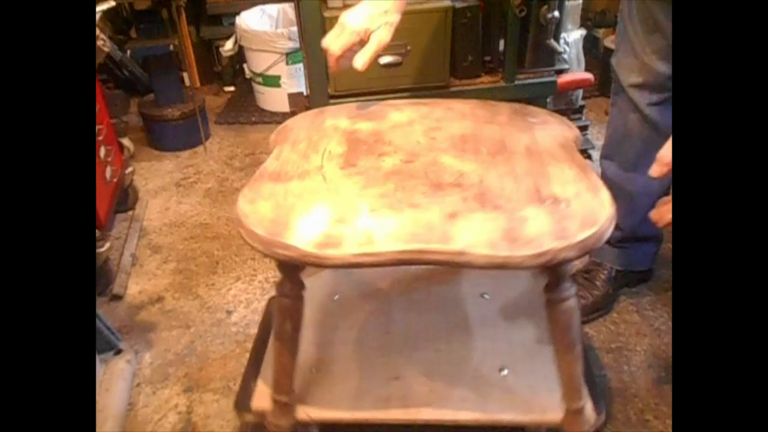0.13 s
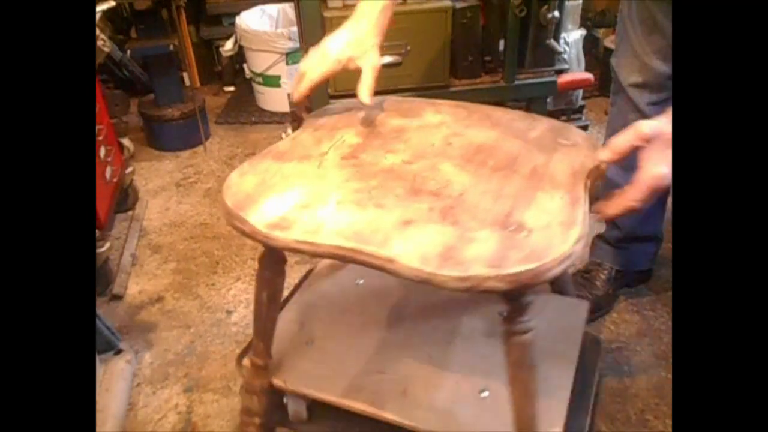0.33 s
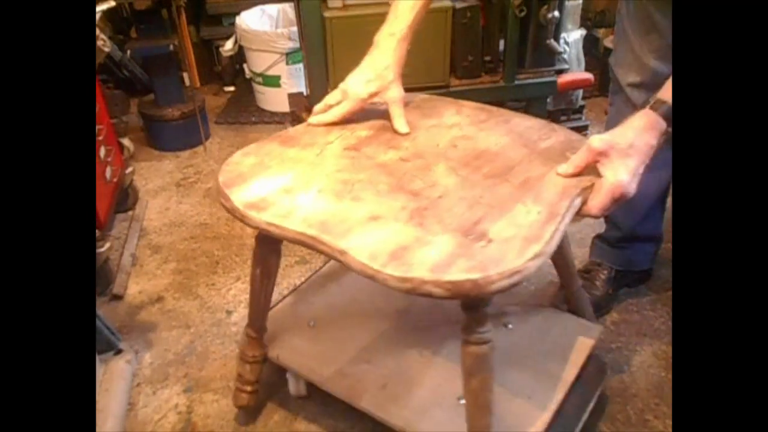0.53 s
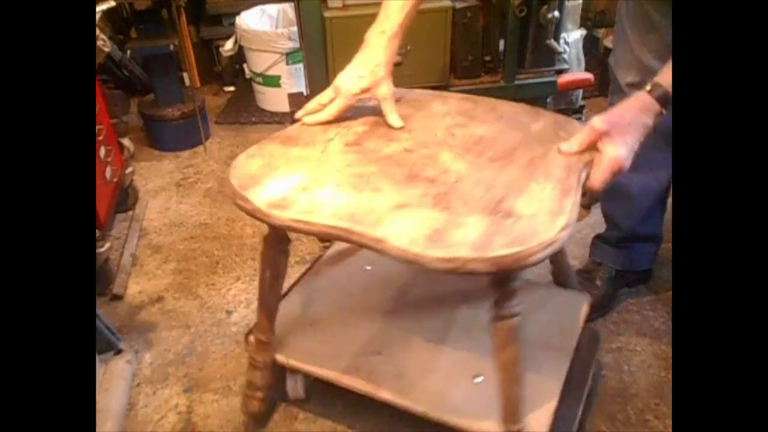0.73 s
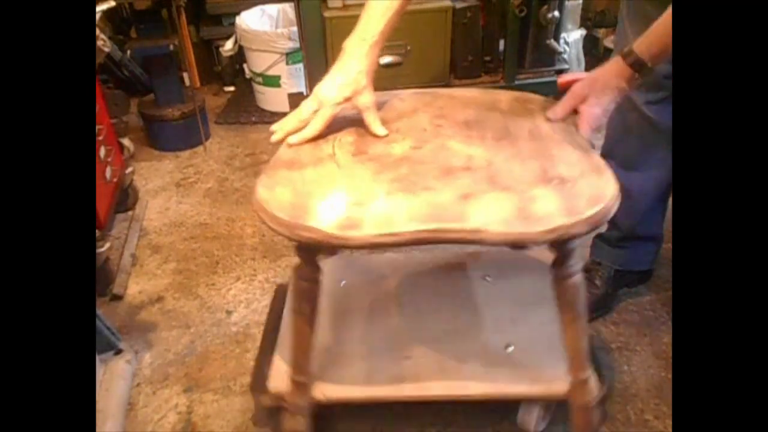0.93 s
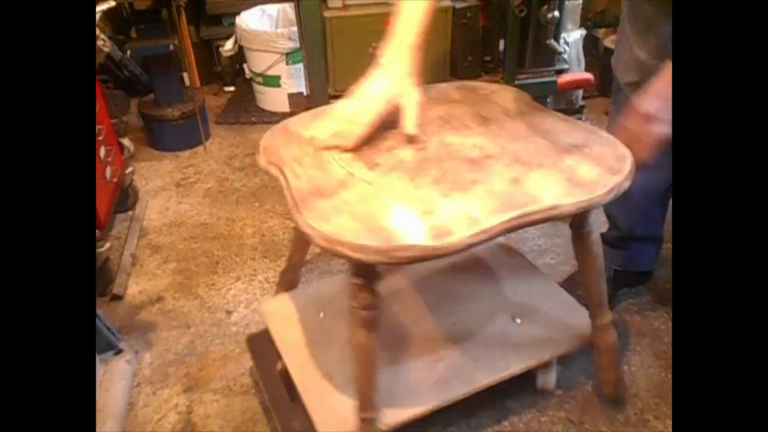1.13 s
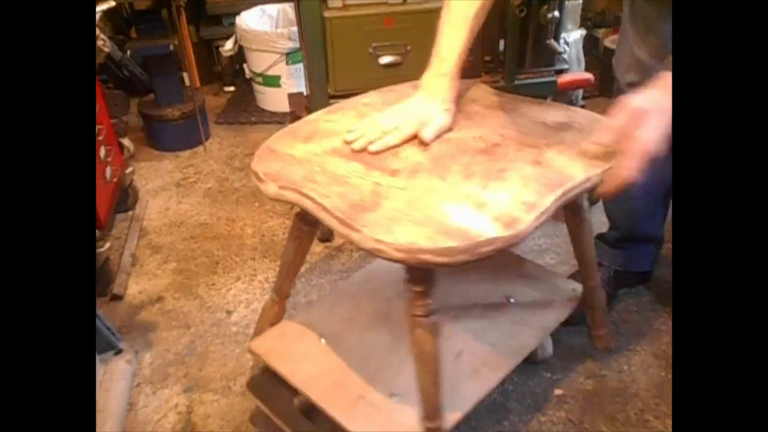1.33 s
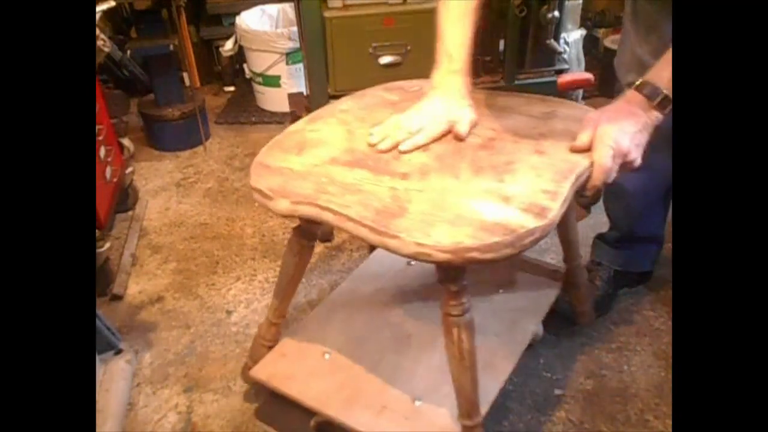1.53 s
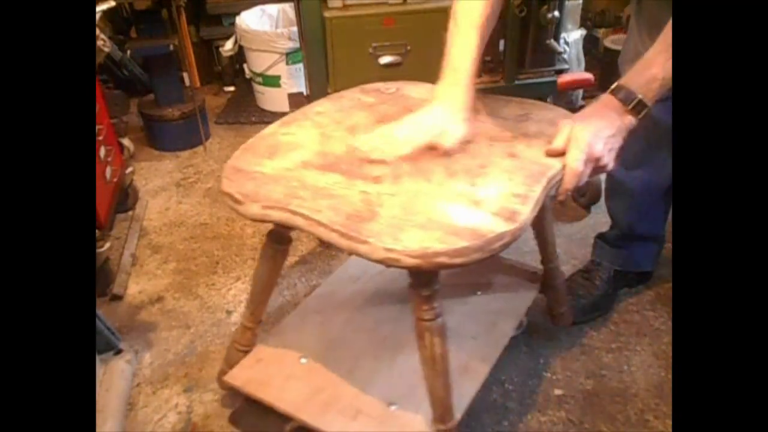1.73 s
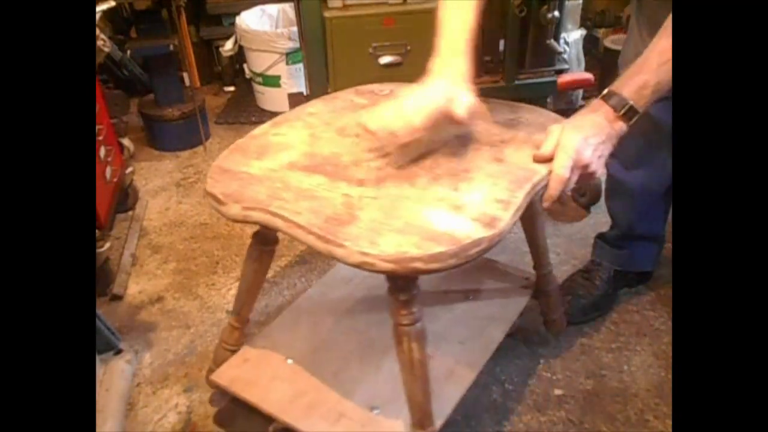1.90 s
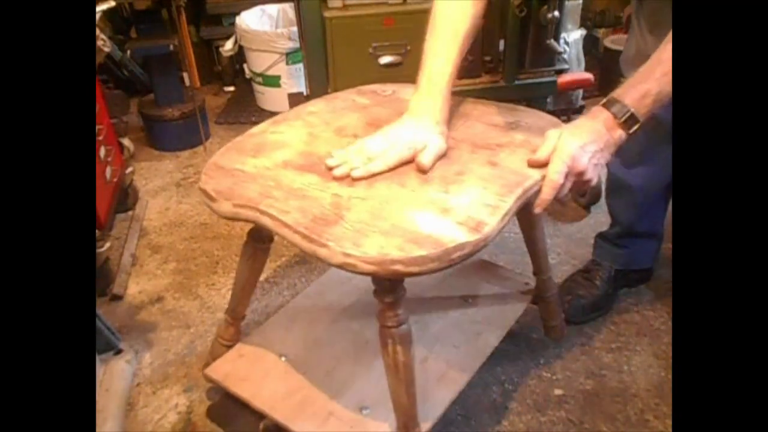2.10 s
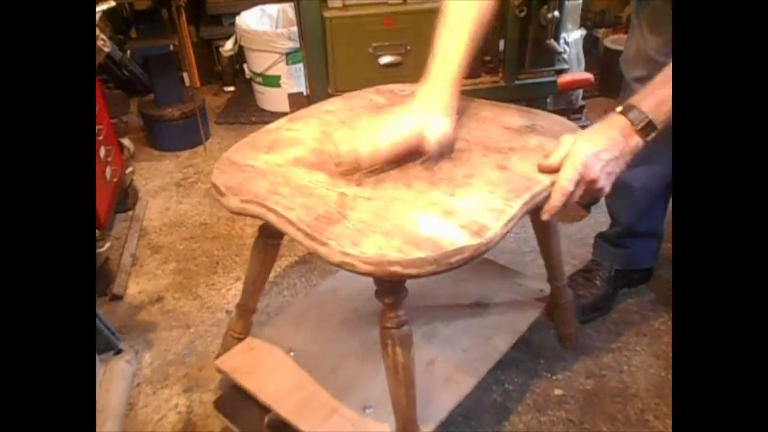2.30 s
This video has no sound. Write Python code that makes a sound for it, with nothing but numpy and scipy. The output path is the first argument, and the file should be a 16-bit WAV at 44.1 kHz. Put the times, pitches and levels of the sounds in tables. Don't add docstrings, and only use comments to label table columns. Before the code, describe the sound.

A wooden trolley carrying a stool rolls jerkily over rough concrete, hard casters knocking and boards rattling; it stops with leg clunks, then a palm rubs and slaps the seat, close microphone in a small workshop.

```python
import sys
import numpy as np
from scipy import signal
from scipy.fft import rfft, irfft
from scipy.io import wavfile
from scipy.ndimage import uniform_filter1d, minimum_filter1d

SR = 44100
rng = np.random.default_rng(int(sys.argv[2]) if len(sys.argv) > 2 else 0)


def decibels_to_gain(level_db):
    exponent = np.asarray(level_db, float) / 20
    return 10 ** exponent


def waveform_to_disk(signal):
    frames = np.transpose(np.atleast_2d(signal))
    scaled = np.clip(frames, -1, 1) * 32767
    samples = np.round(scaled).astype(np.int16)
    wavfile.write(sys.argv[1], SR, samples)


N = 103899

# (t/s, peak/dB, treble/dB, rattle/s, body/dB)
WHEEL_KNOCKS = [(0.001, -7.5, -43, 0.013, -4), (0.131, -4.5, -16.5, 0.025, -4),
                (0.155, -9, -21, 0.0085, -8), (.298, -14, -1, 0.0032, -14), (0.303, -4, -17.5, 0.029, -3),
                (0.408, -26, -24, 0.013, 9), (0.452, -10.5, -16, 0.036, -2), (0.518, -14.5, -14, 0.032, -5),
                (0.54, -5, -24.5, 0.02, -7.5), (0.596, -10.5, -27, 0.011, -13),
                (0.694, -15.5, -6, 0.023, -3), (0.7, -4.5, -14.5, 0.014, -6.5),
                (0.801, -11.5, -9.5, 0.019, -5), (0.832, -20, 18, 0.015, -4), (.862, -22, -11, 0.013, 14),
                (0.917, -12, -14, 0.011, -23), (1.04, 4, -10, 0.004, -2), (1.043, -0.5, -26, 0.0028, -17),
                (1.062, 11.5, -16, 0.0022, -29), (1.065, 10, -5, 0.012, -5.5), (1.076, 0, -22, 0.011, -6),
                (1.088, -4.5, -18, 0.015, -27), (1.094, -0.5, -8.5, 0.0058, -9),
                (1.104, -1, -23, .006, -27), (1.114, 0.5, -15, 0.0054, -25), (1.119, 3, -32, 0.0065, 0),
                (1.132, -8.5, -10.5, 0.044, -16), (1.267, -14, -31, 0.0057, -3),
                (1.304, -21.5, -9, 0.028, 0)]
# (t/s, peak/dB, treble/dB, rattle/s, body/dB)
WHEEL_BUMPS = [(0.025, -6, -15, 0.013, -5), (0.085, -6, -16, 0.012, -4), (0.196, -7.5, -19.5, 0.022, -15),
               (0.232, -9.5, -7.5, 0.02, 3.5), (0.256, -12.5, -17, 0.029, -5),
               (0.324, -6.5, -22, 0.0054, 1), (0.35, -9, -11, 0.0099, -3), (0.375, -15, -28, 0.006, -1),
               (0.423, -5.5, -12, 0.0071, -15.5), (0.478, -15.5, -19, 0.012, -5),
               (0.625, -9.5, -19, 0.016, -3), (0.727, -6, -15.5, 0.012, -10.5),
               (0.747, -12, -13, 0.012, -1), (0.905, -11.5, -8, 0.019, 4), (0.933, -6.5, -14, 0.03, -3),
               (0.958, -0.5, -4, 0.023, -3), (0.99, -9, -5, 0.031, 5), (1.013, -4.5, -16.5, 0.032, -7),
               (1.142, -9, -21, 0.015, 5), (1.177, -3, -14, 0.0024, -2.5), (1.205, -8.5, -19.5, 0.022, -3),
               (1.229, -27, -10, 0.009, 2)]
# (t/s, peak/dB, treble/dB, rattle/s, body/dB)
LEG_KNOCKS = [(1.393, -5, -2, 0.017, 0.5), (1.447, -23, -40, 0.0051, 12), (1.484, -13.5, -37, 0.015, 6.5),
              (1.545, -18.5, -32, 0.0095, 4), (1.554, -14, -27, 0.0065, -5.5),
              (1.563, -22, -24, 0.014, -7.5), (1.66, -12.5, -14.5, 0.021, -6), (1.684, -21, -22, 0.031, 24),
              (1.885, -35, 3, 0.016, 10), (1.898, -43, -18, 0.0097, 1), (2.042, -38, -40, 0.019, 5),
              (2.122, -11, -19, 0.015, -9), (2.263, -39, -31.5, 0.006, 8), (2.3, -31, -40, 0.0082, 0),
              (2.316, -29, -38, 0.0054, 27), (2.327, -32, -34, 0.049, 16), (2.351, -30, -27, .01, 14)]
# (t/s, peak/dB, treble/dB, rattle/s, body/dB)
PALM_SLAPS = [
    (1.994, -28.5, -25.5, 0.012, -8.5),
    (2.087, 9, -11.5, 0.0022, -0.5),
    (2.254, -41, 31, 0.002, -1),
    (2.257, -43.5, 26, 0.013, -1),
]
# (t/s, level/dB)
ROLL_EFFORT = [(0, -21), (.06, -24), (.2, -29), (.29, -29.5), (.38, -29), (.41, -28), (.5, -39),
               (.58, -39.5), (.68, -36.5), (.78, -37), (.88, -26.5), (.97, -33), (1.1, -40.5),
               (1.22, -24.5), (1.3, -35.5), (1.39, -40)]
# (t/s, level/dB)
RUB_EFFORT = [
    (1.39, -32.5),
    (1.47, -35),
    (1.58, -41.5),
    (1.7, -34),
    (1.78, -29),
    (1.83, -37),
    (1.87, -51),
    (1.92, -63),
    (1.97, -86),
]
# (f/Hz, level/dB, t60/s)
BOARD_MODES = [(305, -9.5, .06), (560, -9, .035), (781, -4, .05), (925, -6, .05), (1275, -2, .05),
               (1370, -3, .04), (1500, -1, .05), (1712, -3, .05), (2030, -1, .04), (2690, -8, .03),
               (3330, -10, .03), (4085, -11, .03)]
# (f/Hz, level/dB, t60/s)
SEAT_MODES = [(460, 4, 0.088), (591, 12, 0.17), (803, 4, 0.18), (1090, 5, 0.063), (1120, -9, 0.036),
              (1262, 17, 0.08), (1400, 12, 0.038), (1830, 12, 0.079), (2004, 10, 0.026), (3130, 11, 0.036),
              (3870, 25, 0.011), (7000, 7, 0.012)]
# (f/Hz, level/dB, t60/s)
STOOL_BOUNCE = [(124, -1, .26), (185, 1, .24)]
# (f/Hz, level/dB, t60/s)
SLAP_BOUNCE = [(135, -14, .12), (185, 0, .19)]
# (f/Hz, level/dB per Hz)
BOARD_COLOUR = [(35, -79), (250, -17.5), (340, -3), (1000, -1.5), (1300, -0.5), (2100, -3.5), (4500, -12),
                (5400, -15), (22000, -33.5)]
# (f/Hz, level/dB per Hz)
LEG_CLACK_COLOUR = [(35, -61), (400, -36), (760, 10), (1500, 15), (3500, 4), (5500, -2.5), (22000, -46.5)]
# (f/Hz, level/dB per Hz)
SLAP_COLOUR = [(35, -67), (250, -26.5), (560, -12.5), (1150, -6.5), (2440, -7.5), (3900, -4), (6300, -11),
               (7400, -6.5), (22000, -34.5)]
# (f/Hz, level/dB per Hz)
SKIN_COLOUR = [(120, -42), (400, -11), (1400, -13), (3000, -11.5), (4500, -7), (5500, -12), (8000, -10.5),
               (10500, -16), (22000, -67)]
# (f/Hz, level/dB per Hz)
SHOP_COLOUR = [(15, 8), (40, 10.5), (100, -12), (400, -3), (1700, -7.5), (2500, -10), (9000, -14),
               (22000, -24)]
# (centre t/s, length/s, low f/Hz, high f/Hz, stray line f/Hz)
HELD_MOMENTS = [
    (.059, .007, 500, 4300, 4150),
    (.187, .011, 700, 3700, 5615),
    (1.079, .016, 1100, 4800, 6668),
    (1.576, .006, 500, 4900, 6950),
    (2.342, .018, 250, 3100, 3975),
]


def trolley_blows():
    knocks = blows(WHEEL_KNOCKS, BOARD_MODES, BOARD_COLOUR, STOOL_BOUNCE,
                   ring_db=-6, bounce_db=-20.5, gain_db=-10.5, rise_s=0.00093)
    bumps = blows(WHEEL_BUMPS, BOARD_MODES, BOARD_COLOUR, STOOL_BOUNCE,
                  ring_db=-6, bounce_db=-20, gain_db=-9.5, rise_s=.012)
    legs = blows(LEG_KNOCKS, BOARD_MODES[2:], LEG_CLACK_COLOUR, STOOL_BOUNCE,
                 ring_db=-6, bounce_db=-15, gain_db=-6.5, rise_s=0.00057)
    return knocks + bumps + legs


def palm_slaps():
    return blows(PALM_SLAPS, SEAT_MODES, SLAP_COLOUR, SLAP_BOUNCE,
                 ring_db=-4, bounce_db=-20, gain_db=-0.042, rise_s=0.00047)


def rolling():
    clack = colour(BOARD_COLOUR)
    wheels = [body(BOARD_MODES, clack, ring_db=-6, bounce_db=-18) for wheel in range(5)]
    shake = np.zeros(N)
    for wheel in wheels:
        grit = clicks(rate=1600, spread_db=4, size=N) * decibels_to_gain(10.8 * walk(30.84))
        shake += through(grit, wheel)
    return level(shake * decibels_to_gain(1.9 * walk(46.1)), 0) * curve(ROLL_EFFORT)


def palm_rub():
    hiss = rng.standard_normal(N) * decibels_to_gain(1.5 * walk(110))
    grain = 0.15 * clicks(rate=900, spread_db=3.0, size=N)
    return level(through(hiss + grain, colour(SKIN_COLOUR)), 0) * uniform_filter1d(curve(RUB_EFFORT), size=600)


def blows(rows, modes, clack_colour, bounce, ring_db, bounce_db, gain_db, rise_s):
    lead = 4096
    out = np.zeros(N + 32768)
    t = np.arange(4096) / SR
    clack = colour(clack_colour)
    below_treble = signal.butter(2, 5200, fs=SR, output="sos")
    below_body = signal.butter(2, 1250, fs=SR, output="sos")
    for s, db, treble_db, rattle_s, body_db in rows:
        rise = np.exp(3 * (t / rise_s - 1))
        decay = np.exp(-(t - rise_s) / max(rattle_s, .0005))
        shape = np.minimum(rise, decay)
        contacts = clicks(rate=3400, spread_db=1.9, size=len(t)) + 0.32 * rng.standard_normal(len(t))
        hit = contacts * shape
        tick = hit * shape ** (1 / .55 - 1)
        treble = tick - signal.sosfiltfilt(below_treble, tick)
        hit = signal.sosfiltfilt(below_treble, hit) + decibels_to_gain(treble_db + 15.5) * treble
        hit = hit + (decibels_to_gain(body_db) - 1) * signal.sosfiltfilt(below_body, hit)
        y = signal.fftconvolve(hit, body(modes, clack, ring_db, bounce_db=-60))
        y *= decibels_to_gain(db + gain_db) / np.sqrt(np.max(uniform_filter1d(y ** 2, size=128)))
        push = shape ** 3 / np.sum(shape ** 3)
        bouncing = signal.fftconvolve(push, ring(bounce, 1.0))
        y += bouncing * decibels_to_gain(db + bounce_db + 17.5 + rng.standard_normal())
        k = int((s - rise_s) * SR) + lead
        out[k:k + len(y)] += y
    return out[lead:N + lead]


def body(modes, clack, ring_db, bounce_db):
    h = decibels_to_gain(ring_db) * ring(modes, 1.0) + decibels_to_gain(bounce_db) * ring(STOOL_BOUNCE, 0.19)
    h[:len(clack)] += clack
    return h


def ring(modes, scatter):
    t = np.arange(6144) / SR
    hz, db, t60 = np.repeat(np.array(modes), 2, axis=0).T[:, :, None]
    chance = scatter * rng.standard_normal((2, len(hz), 1))
    strength = decibels_to_gain(db + 4 * chance[0])
    detuned_hz = hz * (1 + .009 * chance[1])
    decay = np.exp(-np.log(1000) * t / t60)
    h = np.sum(strength * decay * np.sin(2 * np.pi * detuned_hz * t), axis=0)
    return h / np.sqrt(np.sum(h ** 2))


def clicks(rate, spread_db, size):
    u = rng.random((3, size))
    return (u[0] < rate / SR) * np.sign(u[1] - .5) * decibels_to_gain(-spread_db * np.log(u[2] + .01))


def walk(rate):
    k = int(SR / rate)
    steps = np.repeat(rng.standard_normal(N // k + 1), k)
    return 0.69 * uniform_filter1d(uniform_filter1d(steps, k), k)[:N]


def colour(points, size=1024):
    hz, db = np.array(points).T
    grid_hz = np.arange(size + 1) * SR / (2 * size) + 1
    cepstrum = irfft(np.interp(np.log(grid_hz), np.log(hz), db) * np.log(10) / 20)
    cepstrum[1:size] *= 2
    cepstrum[size + 1:] = 0
    h = irfft(np.exp(rfft(cepstrum)))[:size]
    return h / np.sqrt(np.sum(h ** 2))


def through(x, h):
    return signal.fftconvolve(x, h)[:len(x)]


def level(x, db):
    return x * decibels_to_gain(db) / np.sqrt(np.mean(x ** 2))


def curve(rows):
    t, db = np.array(rows).T
    return decibels_to_gain(np.interp(np.arange(N) / SR, t, db, left=-120, right=-120))


def room(x):
    t = np.arange(SR // 2) / SR
    noise = rng.standard_normal(len(t))
    low = signal.sosfilt(signal.butter(2, 2500, fs=SR, output="sos"), noise)
    low_tail = low * np.exp(-np.log(1000) * t / 0.18)
    high_tail = (noise - low) * np.exp(-np.log(1000) * t / 0.13)
    h = (low_tail + high_tail) * np.clip(t / 0.0065, 0, 1)
    return through(x, h * decibels_to_gain(-5.5) / np.sqrt(np.sum(low_tail ** 2) * 9))


def workshop():
    hiss = level(through(rng.standard_normal(N), colour(SHOP_COLOUR, size=4096)), -53)
    band = signal.butter(2, [25, 70], "band", fs=SR, output="sos")
    rumble = signal.sosfilt(band, rng.standard_normal(N))
    tremble = level(through(rng.standard_normal(N), ring(STOOL_BOUNCE, 0)), -65)
    rumble = rumble * decibels_to_gain(3.0 * walk(10)) * (1 + decibels_to_gain(36) * curve(ROLL_EFFORT))
    return hiss + tremble + level(rumble, -61)


def scene():
    dry = trolley_blows() + palm_slaps() + rolling() + palm_rub()
    dry = signal.sosfilt(signal.butter(3, 144, "high", fs=SR, output="sos"), dry)
    return (dry + room(dry) + workshop())[None]


def hold_steady_tones(x):
    size = 1200
    out, t, win = x.copy(), np.arange(size) / SR, np.hanning(size)
    for s, length, low, high, stray in HELD_MOMENTS:
        k = min(int(s * SR) - size // 2, N - size)
        spec = rfft(x[k:k + size] * win) * 2 / np.sum(win)
        hz, strength = np.arange(len(spec)) * SR / size, np.abs(spec)
        is_peak = strength >= -minimum_filter1d(-strength, size=9)
        tops = strength * is_peak * (hz > low) * (hz < high)
        j = np.argsort(-tops)[:11, None]
        held = np.sum(tops[j] * np.cos(2 * np.pi * hz[j] * t + np.angle(spec[j])), axis=0)
        held = decibels_to_gain(1.5) * (held + decibels_to_gain(-10) * tops.max() * np.sin(2 * np.pi * stray * t))
        fade = np.clip((length / 2 - np.abs(t + k / SR - s)) / .006 + .7, 0, 1)
        out[k:k + size] += np.sin(fade * np.pi / 2) ** 2 * (held - x[k:k + size])
    return out


def band_limit(x):
    return signal.sosfilt(signal.butter(12, 11760, fs=SR, output="sos"), x)


def record(dry):
    rounded = np.tanh(dry[0] / 1.1) * 1.1
    top_cut = signal.cheby1(10, .5, 10260, fs=SR, output="sos")
    x = hold_steady_tones(signal.sosfilt(top_cut, rounded))
    gain = minimum_filter1d(.96 / np.maximum(np.abs(x), .96), size=129)
    gain = uniform_filter1d(uniform_filter1d(gain, size=64), size=64)
    return band_limit((x * gain)[None])


dry = scene()
out = record(dry)
waveform_to_disk(out)
```